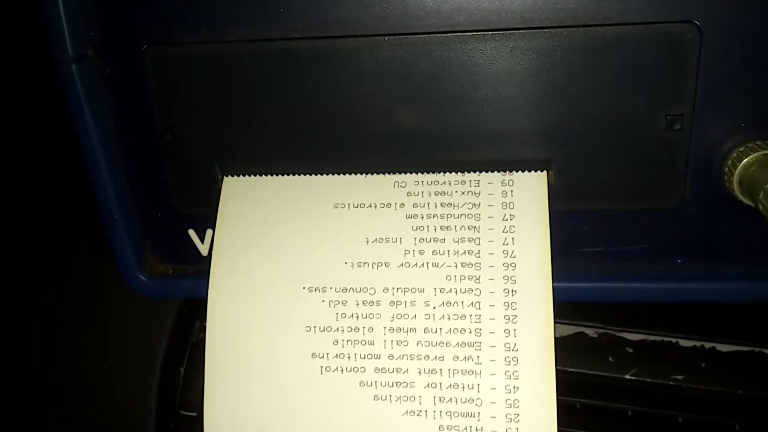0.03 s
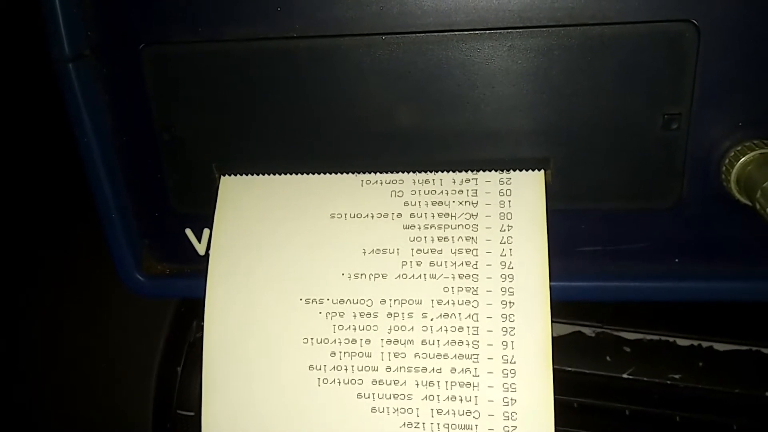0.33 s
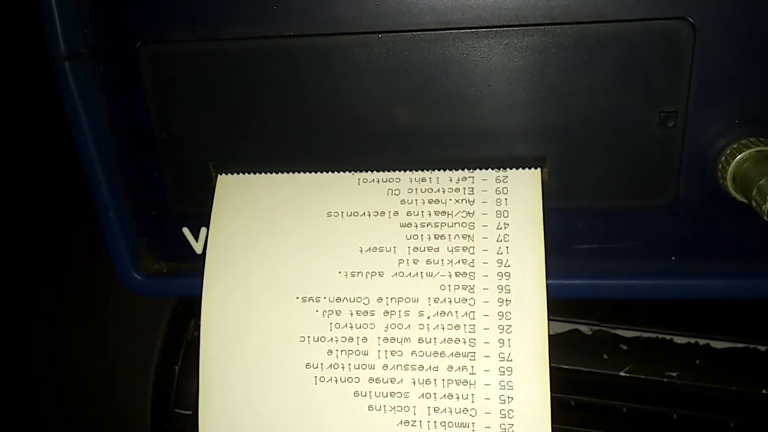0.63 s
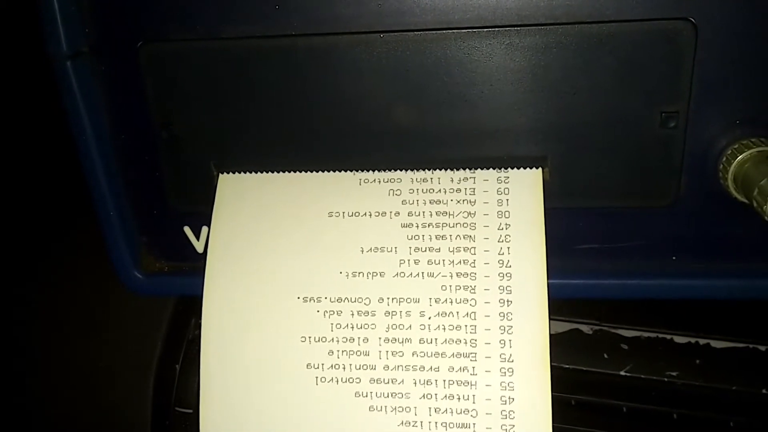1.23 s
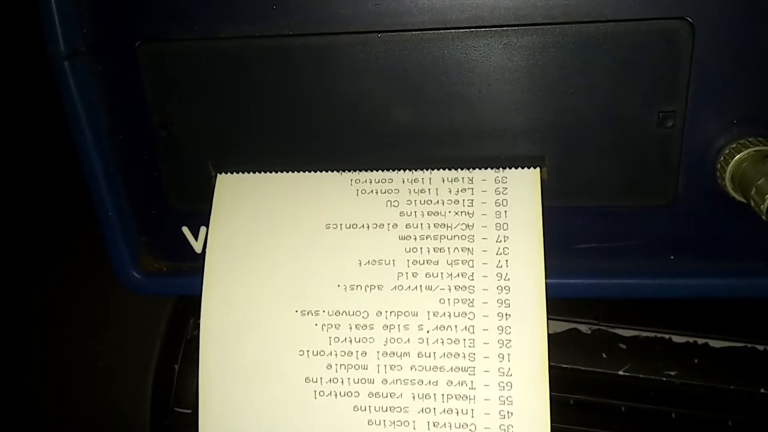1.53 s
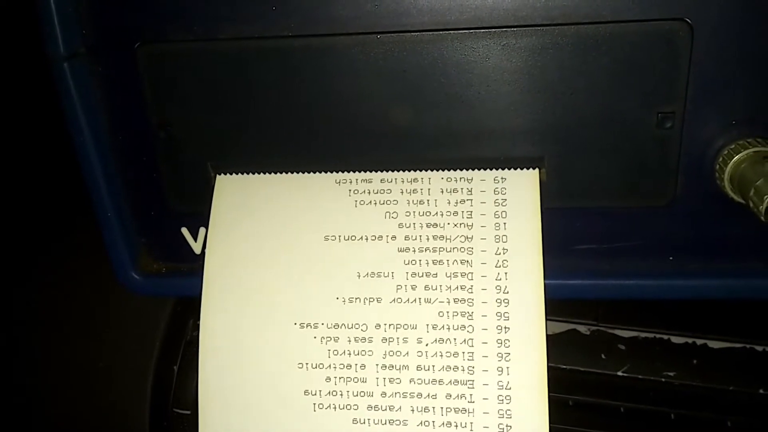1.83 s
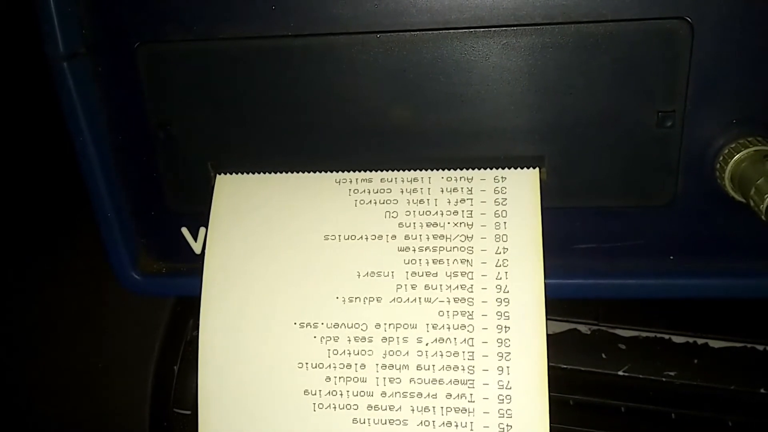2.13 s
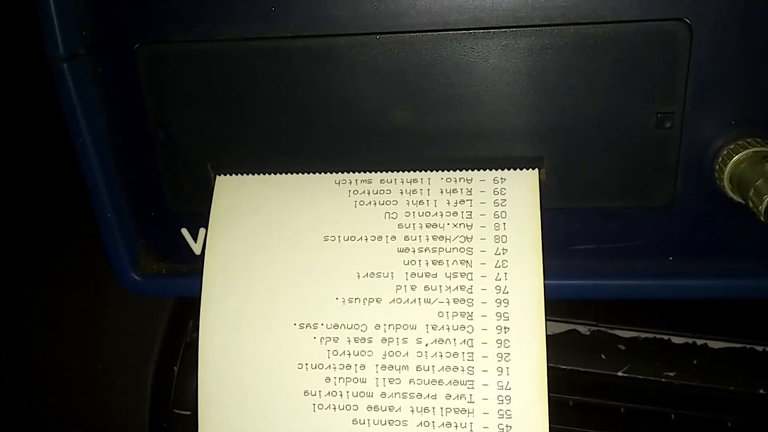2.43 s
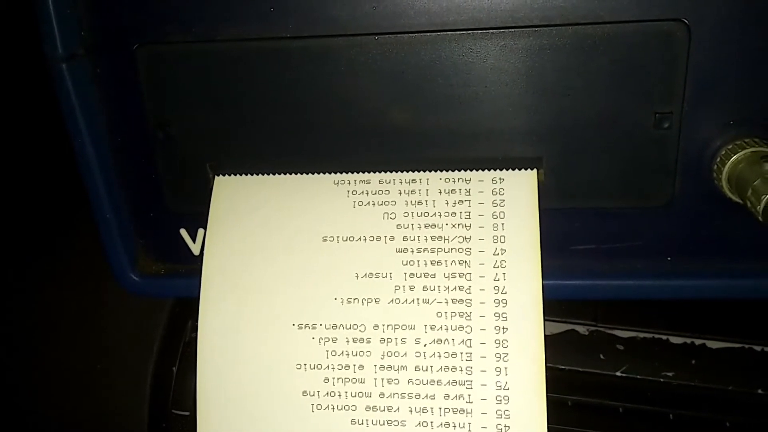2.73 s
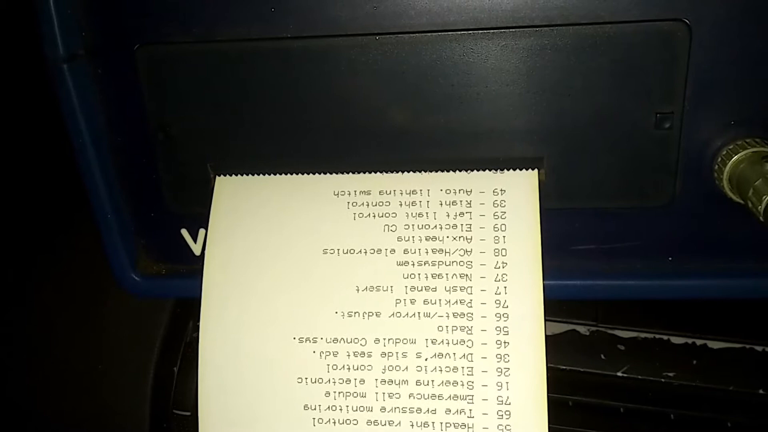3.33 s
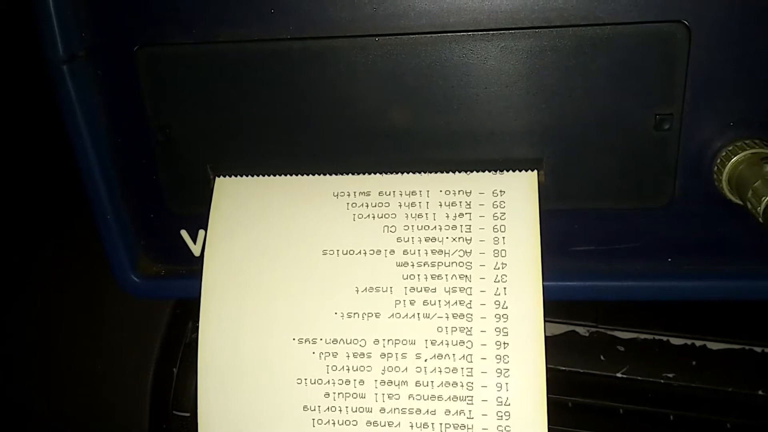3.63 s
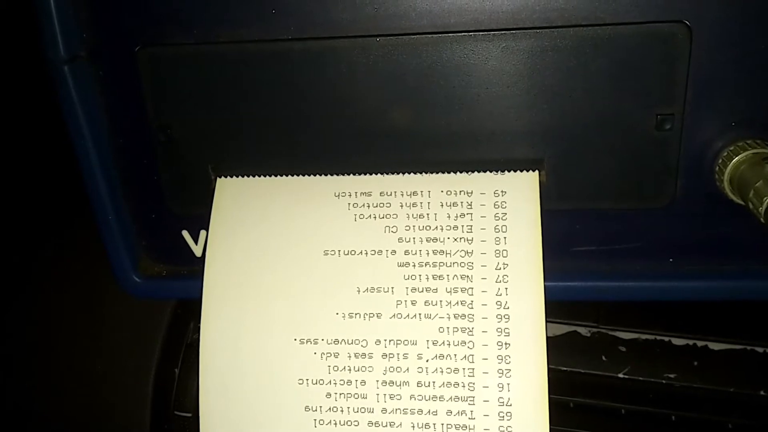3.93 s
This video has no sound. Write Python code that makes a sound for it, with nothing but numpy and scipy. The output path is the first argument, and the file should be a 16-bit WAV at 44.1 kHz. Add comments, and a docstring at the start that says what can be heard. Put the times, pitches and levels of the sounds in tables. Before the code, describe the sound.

Short buzzing, rattling bursts and sharp clacks from a small paper printer, humming in between.

```python
"""A small thermal printer feeds four lines of text in a workshop, close to a stereo microphone, on its left.
For each line a stepper motor buzzes through rattling gears while the paper rasps past the print head;
after three of the lines the motor lets go and the mechanism snaps back, clacking. The electronics hum.
Far off, something like an engine rumbles; soft hiss, two taps and a regular high tick lie behind."""
import sys
import numpy as np
from scipy import signal
from scipy.fft import rfft, irfft
from scipy.io import wavfile

SR = 44100
rng = np.random.default_rng(int(sys.argv[2]) if len(sys.argv) > 2 else 0)


def transcribe(signal):
    """Save signal, clipped to [-1, 1], as a 16-bit WAV file at the path in sys.argv[1]."""
    frames = np.atleast_2d(signal).T
    limited = np.clip(frames, -1, 1)
    pcm = np.round(limited * 32767).astype(np.int16)
    wavfile.write(sys.argv[1], SR, pcm)


N = 176400

# printed lines: start_s, motor_db, engaging_tick_db, knock_offset_db
LINES = [(-.0105, -50, -45, -1), (1.188, -50.5, -34, -0.5), (1.4882, -50, -40, -2),
         (2.8206, -48, -37.5, -0.5)]
CYCLE_HZ = 121.9   # the motor makes four steps per cycle


def motor():
    """Steps and loose gear teeth strike the case; harmonics of the motor's cycle add a clean whine."""
    # strength of the four steps: level_db
    step_db = [-10, -15.5, -12, -4.5]
    # load on the gears along a line: after_start_s, level_db
    load = [(0, 2), (.06, -8), (.11, 0), (.17, 1.5), (.215, -2.5), (.247, 1.5)]
    # resonances of the case: frequency_hz, gain_db
    case = [(200, -14), (420, -20), (540, -2), (620, 3.5), (730, 3.5), (910, -7), (1080, 2.5), (1270, 5.5),
            (1500, -5), (2000, -20), (2230, -13), (2500, -23), (3600, -27), (6000, -27), (16000, -28)]
    # whine: cycle_multiple, level_db
    harmonics = [(1, -13), (2, -10), (5, -11), (6, -8.5), (7, -15.5), (9, -8), (13, -20)]
    jitter_s, spread_db, rattles_per_s = .00013, 2, 700
    t = clock()
    step = np.arange(int(4 * CYCLE_HZ * N / SR))
    late, hard = rng.standard_normal((N // 20, 2))[:len(step)].T
    step_gain = from_db(np.array(step_db)[step % 4] + spread_db * hard)
    steps = clicks(step / (4 * CYCLE_HZ) + jitter_s * late, step_gain)
    teeth = rng.random(N) < rattles_per_s / SR
    rattle = teeth * from_db(3 * rng.standard_normal(N)) * rng.choice([-1, 1], N)
    strikes = rms_one(steps - steps.mean() + from_db(-2) * rattle * steps.std() / rattle.std())
    effort = sum(running(s) * from_db(db + curve(load, t - s)) for s, db, *_ in LINES)
    whine = sum(from_db(db) * sine(m * CYCLE_HZ * t + rng.random()) for m, db in harmonics)
    return colour(effort * strikes, case) + effort * whine


def running(start_s, line_s=0.2439, release_s=0.005):
    """1 while a line is fed, then a quick release."""
    t = clock() - start_s
    return (t >= 0) * np.exp(-np.clip((t - line_s) / release_s, 0, 20))


def paper():
    """The paper rasps past the head, pulsing with the motor."""
    # friction noise: frequency_hz, gain_db
    rasp = [(1000, 6), (2500, 4), (4000, 3), (5200, -3.5), (6500, -5), (8300, -1), (10000, -.5),
            (12000, 4.5), (15000, 3), (16000, -3)]
    feed = sum(running(s) for s, *_ in LINES)
    pulse = 1 + .35 * np.sin(2 * np.pi * CYCLE_HZ * clock())
    grain = rms_one(from_db(2.8 * drift(800)))
    return from_db(-53.4) * colour(feed * pulse * grain * rng.standard_normal((2, N)), rasp)


def gear_knocks():
    """A sharp tick as the motor engages, then dull knocks at the same places in every line."""
    # gear knocks: after_start_s, level_db
    knocks = [(.018, -27), (.0275, -16.5), (.1075, -27), (.1102, -22), (.1475, -26), (.162, -24),
              (.1905, -14), (.2012, -26), (.2295, -26.5), (.2435, -24)]
    # spectrum of a knock: frequency_hz, gain_db
    spectrum = [(380, -23), (700, -5), (860, -13), (1050, -2), (1260, 6.5), (1550, -9), (1950, -16),
                (2230, -8), (2700, -18), (3900, -19), (6500, -34), (16000, -33)]
    ticks = snaps([(s, db) for s, _, db, _ in LINES])
    hits = [(s + after, db + offset_db) for s, _, _, offset_db in LINES for after, db in knocks]
    times, db = np.transpose(hits)
    return ticks + colour(clicks(times, from_db(db)), spectrum)


def clacks():
    """The mechanism snaps back brightly, then a duller rebound sets the housing ringing."""
    # clacks: start_s, snap_db, rebound_delay_s, rebound_db, ring_db
    events = [(0.2576, -31.5, 0.0067, -38.5, -44), (1.7551, -31.5, 0.0029, -42, -44),
              (1.8249, -30, 0.00386, -35.5, -40), (3.0966, -33.5, 0.006, -37.5, -43.5)]
    # spectrum of the rebound: frequency_hz, gain_db
    spectrum = [(300, -13), (580, 10.5), (900, 4.5), (1300, 5), (2000, 3), (3500, -9), (6000, -14),
                (16000, -16)]
    # modes of the housing: pitch_hz, level_db, t60_s
    housing = [(520, -12, .12), (598, -1, .07), (662, -2, .15), (805, -13, .13), (1244, -11, .11)]
    s, snap_db, delay, rebound_db, ring_db = np.transpose(events)
    t = clock()[:SR // 2]
    modes = sum((-1) ** k * from_db(db) * dying(t, t60) * np.sin(2 * np.pi * hz * t)
                for k, (hz, db, t60) in enumerate(housing))
    ring = signal.fftconvolve(clicks(s + delay, from_db(ring_db)), modes)[:N]
    snap = snaps(list(zip(s, snap_db)))
    rebound = bursts(zip(s + delay, rebound_db), spectrum, t60_s=0.04, shared=0.77)
    return snap + rebound + ring


def snaps(rows):
    """For each (start_s, level_db): a hard impact, a short crunch and a faint sizzling tail."""
    # spectrum of a snap: frequency_hz, gain_db
    spectrum = [(300, 3.5), (650, -1), (1300, 5), (2100, 4.5), (2800, -5), (3900, 8.5), (5500, -8.5),
                (9000, -2), (12700, 1.5), (16000, 3)]
    s, db = np.transpose(rows)
    tail = bursts(zip(s, db - 19), spectrum, t60_s=.06, shared=0.15)
    crunch = bursts(rows, spectrum, t60_s=0.016, shared=0.96)
    impact = colour(clicks(s, from_db(db + 4)), spectrum)
    return crunch + impact + tail


def at_microphone(x):
    """Nearby surfaces scatter the treble and the room answers; the left side is louder and earlier."""
    # balance of the printer: frequency_hz, left_minus_right_db
    balance = [(200, 2), (700, 7.5), (1100, 10), (1450, 8.5), (2200, 10), (3400, 5), (8000, 0),
               (15000, 5.5)]
    # scattered treble: left_db, right_db
    scatter_db = [-8, 1]
    right_delay_s = .0001
    treble = signal.sosfilt(signal.butter(2, 2000, "high", fs=SR, output="sos"), x)
    x = x + from_db(scatter_db)[:, None] * reflections(treble, t60_s=.015)
    x = x + from_db(-17) * reflections(x, t60_s=.12)
    left, right = irfft(rfft(x, 2 * N) * pan(per_bin(balance)))[:, :N]
    return np.array([left, np.interp(clock() - right_delay_s, clock(), right)])


def hum(pitch_hz=244.3, waver=0.0028):
    """Steady electrical hum; its thin overtones flutter more the higher they lie."""
    # hum: pitch_multiple, level_db, left_minus_right_db
    harmonics = [(1, -60.5, 3), (2, -80.5, 7.5), (3, -88, -5), (4, -78, -4), (5, -81, 20.5), (6, -80, 9.5),
                 (7, -79.5, 18), (8, -82, 18), (9, -93, 22)]
    turns = np.cumsum(pitch_hz * (1 + waver * drift(29))) / SR
    return sum(pan(side_db) * from_db(db + .6 * np.sqrt(m) * drift(12)) * sine(m * turns + rng.random())
               for m, db, side_db in harmonics)


def rumble():
    """Something like an engine far off: low, beating tones and dull noise that fade halfway through."""
    # low tones: pitch_hz, level_db, share_of_swell, waver_hz
    partials = [(43.2, -56, 1, 1.55), (51.05, -61.5, 0.54, 1.14), (127.3, -65.5, 0.97, 2.37),
                (164.8, -77.5, 0.39, 4.25)]
    # swell of the tones: time_s, level_db
    tone_swell = [(0, 1.5), (.35, 5.5), (.7, 5), (1.1, 0.5), (1.75, 2), (2.2, -5.5), (3, -8), (3.5, -9),
                  (4, -19)]
    # swell of the noise: time_s, level_db
    noise_swell = [(0, -2), (.25, 3), (.41, 2), (.65, 1), (1.1, -2.5), (1.8, -5), (2.3, -8.5), (4, -9.5)]
    # dull noise: frequency_hz, gain_db
    spectrum = [(28, -18), (45, -2), (65, -4.5), (90, 4.5), (150, 2), (270, 1.5), (400, -8), (900, -36.5)]
    swell_db = curve(tone_swell, clock())
    tones = 0
    for hz, db, share, waver_hz in partials:
        gain = from_db(db + share * swell_db + 2.4 * drift(5.1))
        tones += gain * sine(np.cumsum(hz + waver_hz * drift(11)) / SR)
    noise = colour(rng.standard_normal(N) + 0.41 * rng.standard_normal((2, N)), spectrum)
    return pan(1.5) * (tones + from_db(-60.5 + curve(noise_swell, clock())) * noise)


def moan(waver_hz=7):
    """A low tone swells out of the rumble and sinks in pitch."""
    # course of the moan: time_s, pitch_hz, level_db
    glide = [(.2, 300, -75), (.28, 280, -60), (.34, 270, -66), (.41, 255, -56), (.47, 228, -62),
             (.56, 205, -76)]
    s, hz, db = np.transpose(glide)
    t = clock()
    turns = np.cumsum(np.interp(t, s, hz) + waver_hz * drift(35)) / SR
    envelope = from_db(np.interp(t, s, db)) * (t > s[0]) * (t < s[-1])
    return pan(1.4) * envelope * sine(turns)


def room_tone():
    """Soft, wide hiss; well to the left, two faint taps and a regular treble tick."""
    # hiss: frequency_hz, gain_db
    hiss_colour = [(20, -10), (100, 14.5), (250, -1), (400, 3), (540, 9), (600, 15.5), (680, 10),
                   (1200, 7.5), (2000, 4), (2220, 6), (2450, 2), (3100, 0.5), (3500, 3.5), (5200, -2.5),
                   (9500, -2), (12500, 3), (14300, 5.5), (16000, -7.5)]
    # taps further off: start_s, level_db
    tap_hits = [(.881, -54), (3.699, -52.5)]
    # spectrum of a tap: frequency_hz, gain_db
    tap_colour = [(500, -29), (1200, -5), (1750, -6), (2200, 8.5), (2800, -13.5), (8000, -25.5)]
    # spectrum of a tick: frequency_hz, gain_db
    tick_colour = [(6000, -17), (11000, -9), (14500, 7), (16000, -2)]
    tick_every_s, tick_db = .3195, -56.5
    noise = rms_one(0.3 * rng.standard_normal(N) + rng.standard_normal((2, N)))
    hiss = from_db(-62) * pan(1.5) * colour(noise, hiss_colour)
    taps = bursts(tap_hits, tap_colour, t60_s=.055, shared=1)
    tick_hits = [(s, tick_db) for s in np.arange(.07, N / SR, tick_every_s)]
    ticks = bursts(tick_hits, tick_colour, t60_s=0.028, shared=0.3)
    return hiss + pan(19) * (taps + ticks)


def from_db(db):
    """Decibels to gain."""
    return 10 ** (np.asarray(db) / 20)


def rms_one(x):
    """Scale to rms 1."""
    return x / np.sqrt(np.mean(x ** 2) + 1e-20)


def clock():
    """Time of every sample in seconds."""
    return np.arange(N) / SR


def sine(turns):
    """A sine of rms 1 from its phase in turns."""
    return np.sqrt(2) * np.sin(2 * np.pi * turns)


def pan(db):
    """Left and right gains for a level difference, left minus right."""
    return from_db(np.array([[.5], [-.5]]) * db)


def curve(rows, at):
    """Straight lines through the rows."""
    return np.interp(at, *np.transpose(rows))


def per_bin(spectrum):
    """A spectrum's dB at every bin of a transform of length 2 N."""
    hz, db = np.transpose(spectrum)
    return np.interp(np.log(np.arange(N + 1) * SR / (2 * N) + 1), np.log(hz), db)


def colour(x, spectrum):
    """Minimum-phase filter with the spectrum's shape and a power gain of 1."""
    cepstrum = irfft(np.log(rms_one(from_db(per_bin(spectrum)))))
    cepstrum[1:N] *= 2
    cepstrum[N + 1:] = 0
    return irfft(rfft(x, 2 * N) * np.exp(rfft(cepstrum)))[..., :N]


def drift(rate_hz):
    """Random wander of rms 1, mostly slower than the rate."""
    hz = np.arange(N + 1) * SR / (2 * N)
    return rms_one(irfft(rfft(rng.standard_normal(2 * N)) / (1 + (hz / rate_hz) ** 2))[:N])


def dying(t, t60_s):
    """Exponential decay from t = 0."""
    return (t >= 0) * np.exp(-np.log(1000) * np.clip(t / t60_s, 0, 10))


def clicks(times, gains):
    """Single impulses."""
    out, at = np.zeros(N), (np.asarray(times) * SR).astype(int)
    inside = (at >= 0) & (at < N)
    np.add.at(out, at[inside], np.asarray(gains)[inside])
    return out


def bursts(rows, spectrum, t60_s, shared):
    """Quickly dying noise for each (start_s, level_db); both sides have a share of it in common."""
    envelope = sum(from_db(db) * dying(clock() - s, t60_s) for s, db in rows)
    noise = np.sqrt(shared) * rng.standard_normal(N) + np.sqrt(1 - shared) * rng.standard_normal((2, N))
    return colour(envelope * noise, spectrum)


def reflections(x, t60_s):
    """Dense dying reflections, different on each side; power gain 1."""
    t = clock()[:SR // 2]
    tail = rng.standard_normal((2, len(t))) * dying(t, t60_s)
    tail /= np.sqrt(np.sum(tail ** 2, axis=1, keepdims=True))
    return signal.fftconvolve(x, tail, axes=1)[:, :N]


def scene():
    """The printer close up, over its hum, the distant rumble and the workshop's room tone."""
    printer = motor() + paper() + gear_knocks() + clacks()
    return at_microphone(printer) + hum() + rumble() + moan() + room_tone()


def record(dry):
    """The deepest bass and the top are cut steeply."""
    low_cut_hz, high_cut_hz = 34.6, 15850
    dry = signal.sosfilt(signal.butter(6, low_cut_hz, "high", fs=SR, output="sos"), dry)
    lowpass = signal.firwin(255, high_cut_hz, fs=SR, window="blackman")
    return signal.fftconvolve(dry, lowpass[None], "same", axes=1)


dry = scene()
out = record(dry)
transcribe(out)
```